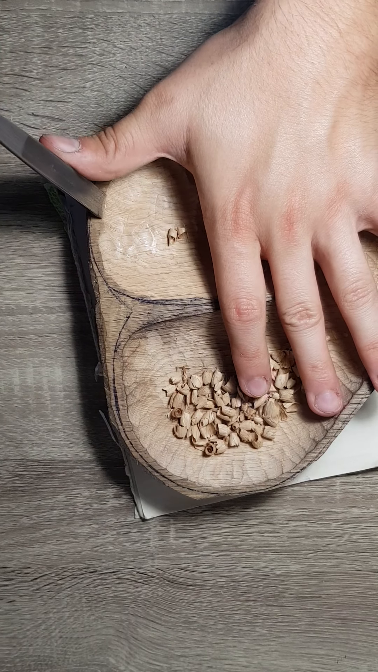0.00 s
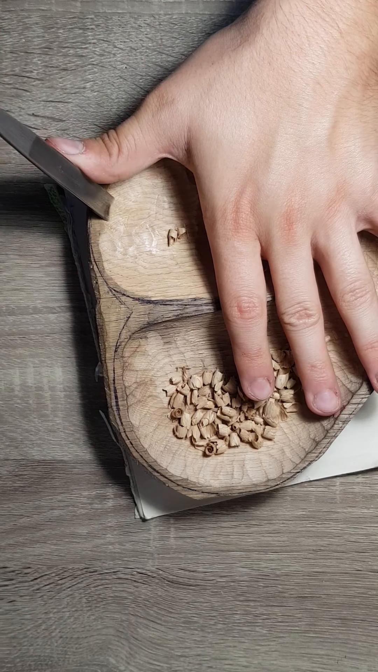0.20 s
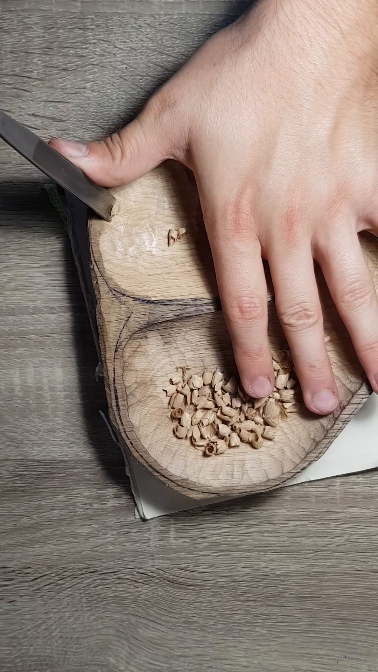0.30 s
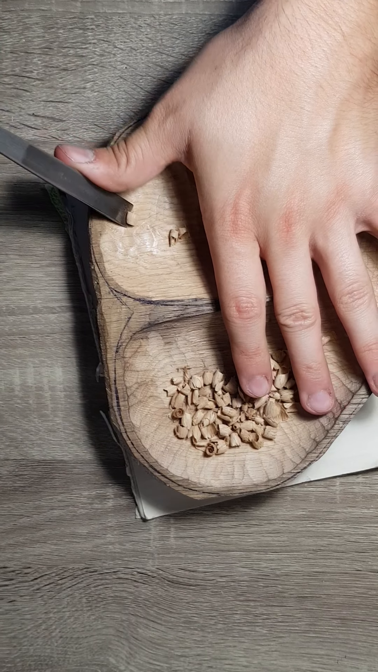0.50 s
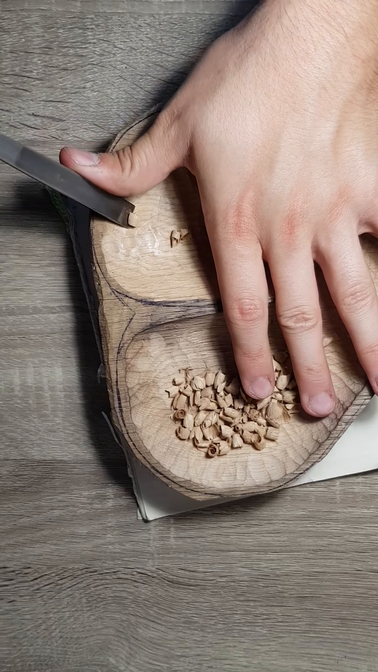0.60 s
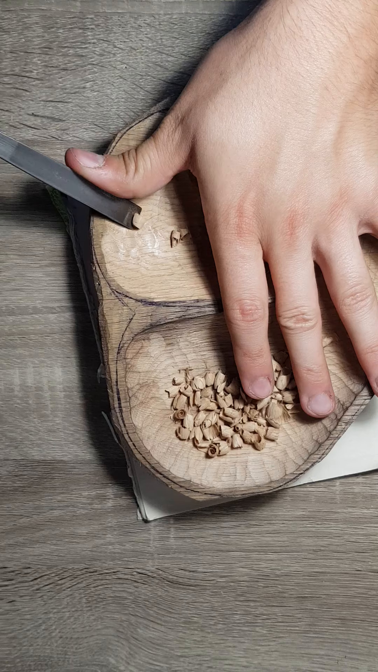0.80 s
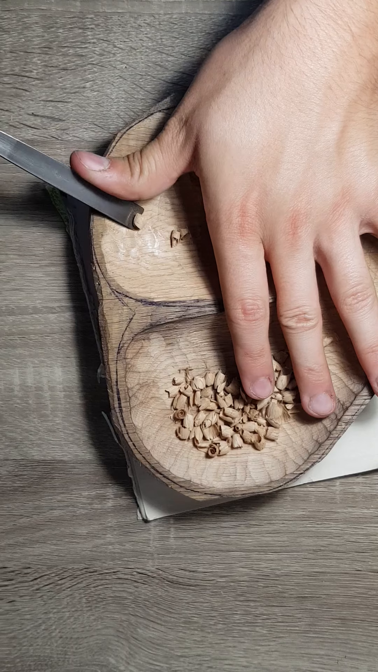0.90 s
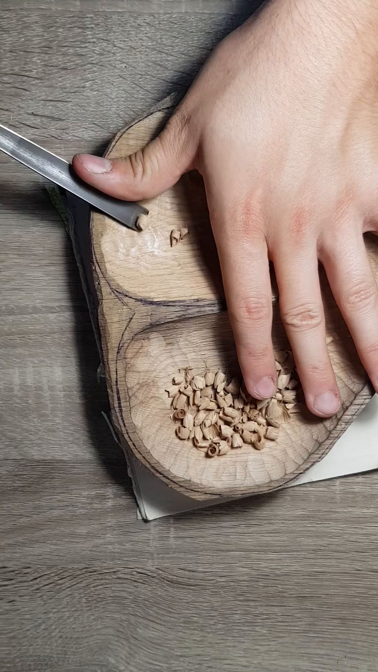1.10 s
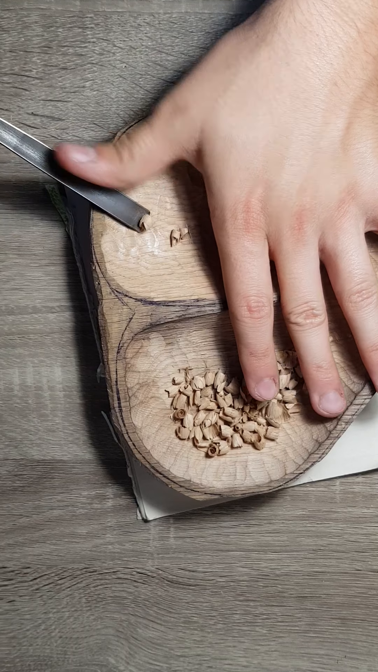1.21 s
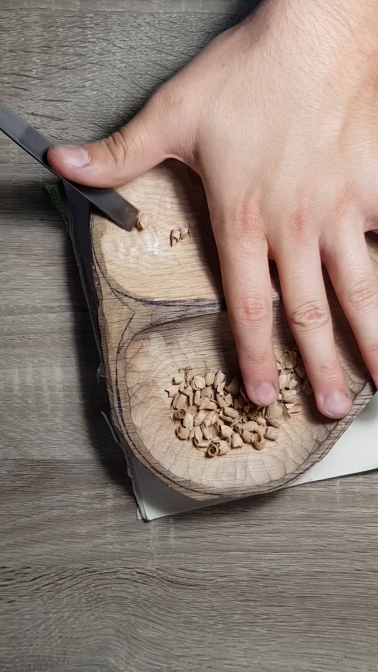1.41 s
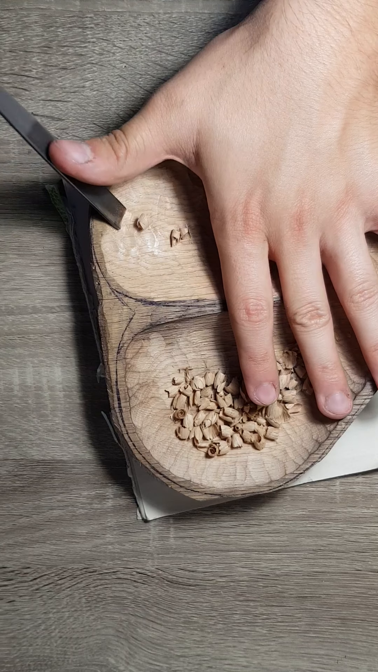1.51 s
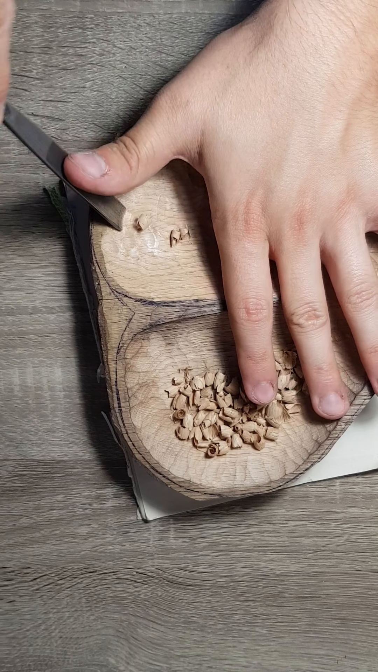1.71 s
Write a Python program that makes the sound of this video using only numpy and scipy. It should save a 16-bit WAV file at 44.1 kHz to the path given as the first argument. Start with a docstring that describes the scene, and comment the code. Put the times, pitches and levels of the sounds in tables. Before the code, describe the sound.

A hand-pushed gouge cuts a wooden bowl blank: a faint rub, a short crunchy knock, then a longer, stronger crunch with low bench thump; light taps and scuffs follow. Quiet bare room, close stereo microphone.

```python
"""A steel edge is first heard rubbing faintly on wood, then a hand-pushed gouge bites twice into a bowl blank.
As fibres give way, each jerk excites decaying modes of the bench (thump) and of the bowl (knock), while
filtered bursts of random grains and short rings make the crackle; narrow bands of grains make thin steel tones.
Light taps and soft scuffs follow as the tool is reset and rubs again.
A bare, quiet room adds reverberation and a faint rumble and hiss."""
import sys
import numpy as np
from scipy import signal
from scipy.fft import rfft, irfft
from scipy.io import wavfile

SR = 44100
rng = np.random.default_rng(int(sys.argv[2]) if len(sys.argv) > 2 else 0)


def wav_record(signal):
    """Record a signal, one row per channel, as 16-bit PCM in the file named by sys.argv[1]."""
    frames = np.transpose(np.atleast_2d(signal))
    bounded = np.clip(frames, -1, 1)
    # unit amplitude maps onto the largest positive 16-bit level
    quanta = np.round(bounded * 32767).astype(np.int16)
    wavfile.write(sys.argv[1], SR, quanta)


N = 79380  # length [samples]

# Table levels are relative; the gains below and the filters set the final balance.
# Fibres giving way: (time [s], bench thump [dB], bowl knock [dB], crack [dB], splinter fizz [dB],
# softness of the jerk [s])
FIBRE_BREAKS = [(0.1501, -39.5, -45.5, -52.5, -84, 0.00056), (.1890, -24, -20, -38.5, -75, 0.00048),
                (0.2107, -18.5, -22, -34, -62.5, 0.0004), (0.237, -32.5, -38.5, -45.5, -60, 0.0002),
                (0.2483, -13, -10.5, -31.5, -64, 0.00051), (0.2593, -14.5, -9, -41.5, -52, 0.00049),
                (0.267, -23, -20.5, -32.5, -52, 0.00025), (0.2855, -14, -8, -33, -50.5, 0.00069),
                (0.4404, -12.5, -4.5, -28.5, -48.5, 0.00024), (0.4608, -19.5, -8, -30, -50, 0.00054),
                (0.4694, -28, -26, -38, -58, 0.00089), (0.4786, -22, -18, -37.5, -58.5, 0.00048),
                (0.495, -11.5, -21.5, -43, -56, 0.00043), (0.5132, -14, -6, -32.5, -44.5, 0.00041),
                (0.5353, -14, -2, -36, -41, 0.0008), (0.5422, -25.5, -10, -24, -44.5, 0.00026),
                (0.5499, -24, -25, -28.5, -57.5, .00031), (0.5677, -15.5, -28, -26.5, -50, 0.00046),
                (.6760, -14.5, -12, -31, -56.5, 0.00046)]
# Light taps of the tool: (time [s], bench thump [dB], bowl knock [dB], tick [dB])
TOOL_TAPS = [(0.8314, -49.5, -45.5, -46), (0.896, -50, -62, -49.5), (.980, -47, -46.5, -70),
             (1.103, -55.5, -71, -89), (1.471, -57.5, -61, -77.5)]
# Soft scuffs as tool and hand shift: (time [s], low bump [dB], hollow knock [dB], rasp [dB])
SOFT_SCUFFS = [(1.062, -73, -69, -86), (1.238, -72, -62.5, -83), (1.347, -60.5, -72.5, -98),
               (1.468, -54.5, -67, -63)]
# Squeaks and faint rings of the steel: (time [s], length [s], frequency [Hz], level [dB])
STEEL_TONES = [(0.13, 0.052, 3470, -64.5), (0.231, 0.064, 3780, -56.5), (0.939, 0.16, 2316, -76.5),
               (1.132, .06, 2386, -82), (1.495, 0.075, 3495, -88.5)]
# Rubbing of the edge: (time [s], level [dB])
RUB_LEVEL = [(0, -100), (0.098, -87), (.145, -61), (0.179, -54.5), (0.198, -36.5), (.28, -72), (.31, -69.5),
             (.43, -79), (0.451, -36.5), (0.551, -33), (.60, -75.5), (0.701, -62), (.92, -62), (1.1, -81),
             (1.699, -104), (1.739, -70.5), (1.763, -62), (1.8, -60)]
# Rumble of the hand shifting the blank: (time [s], level [dB])
HANDLING_LEVEL = [(0, -100), (0.999, -78), (1.21, -76), (1.339, -64), (1.429, -62.5), (1.501, -60),
                  (1.571, -68.5), (1.64, -61), (1.721, -67.5), (1.761, -56.5), (1.8, -57.5)]
# Mode frequencies of the bowl: (frequency [Hz])
BOWL_PITCHES = [229, 243, 270, 350, 385, 398, 451, 593, 640, 715, 827, 930, 1012, 1060, 1171, 1321, 1432,
                1608]
# Modes of the bowl, in the same order: (level [dB], 60 dB decay time [s], left minus right [dB])
BOWL_MODES = [(-22, 0.66, 1.5), (7.5, .013, 0.5), (-13, 0.11, 3), (-1.5, 0.066, -2), (-9, 0.24, -5.5),
              (-33.5, .27, -1.5), (-31, 0.11, 2), (-9, 0.13, 1), (-11, .1, 0), (-9, 0.076, 3.5),
              (-14.5, 0.18, -11), (-4.5, 0.05, 10.5), (-10.5, 0.079, 1), (-22, 0.033, -3), (-12.5, .21, -1),
              (-16.5, 0.084, 3.5), (-14.5, .25, -1.5), (-6, 0.26, 3.5)]
# Mode frequencies of the bench: (frequency [Hz])
BENCH_PITCHES = [38, 69, 89, 110, 127, 133, 146, 197]
# Modes of the bench, in the same order: (level [dB], 60 dB decay time [s])
BENCH_MODES = [(-26.5, .6), (-14.5, 1), (-15, .42), (-16, 0.69), (-8, .58), (0, .42), (-12.5, 0.54),
               (-17.5, 0.58)]
# Spectrum of cracking and of the rubbing rasp: (frequency [Hz], density [dB per Hz])
CRACK_SPECTRUM = [(200, -29.5), (550, 6), (1000, 4), (1400, -3), (1750, 0), (2050, -6.5), (2400, -3.5),
                  (3100, -11.5), (3500, -7), (4400, -15), (4700, -18.5), (5200, -26.5), (5900, -19.5),
                  (8000, -34), (11000, -36.5), (16000, -39)]
# Spectrum of splinter fizz: (frequency [Hz], density [dB per Hz])
FIZZ_SPECTRUM = [(2000, -28), (5500, 9), (8300, -12), (10200, 1), (13000, -1.5), (16000, -8)]
# Spectrum of the groaning wood and the low bumps: (frequency [Hz], density [dB per Hz])
GROAN_SPECTRUM = [(25, -13), (70, -2), (130, 0), (200, -6.5), (380, -11), (520, -27), (1200, -42),
                  (4000, -86)]
# Spectrum of the hollow knock in a scuff: (frequency [Hz], density [dB per Hz])
HOLLOW_SPECTRUM = [(150, -22.5), (300, -16.5), (393, 10), (490, -6.5), (635, 4), (760, -18.5), (1100, -29),
                   (3000, -41)]
# Spectrum of the handling rumble: (frequency [Hz], density [dB per Hz])
RUMBLE_SPECTRUM = [(20, -12), (38, -2), (70, -11), (100, -7), (140, 2), (190, -13), (260, -21), (400, -32),
                   (1000, -59.5), (4000, -90.5)]
# Spectrum of the background rumble and hiss: (frequency [Hz], density [dB per Hz])
FLOOR_SPECTRUM = [(20, -7.5), (40, 4), (120, -3), (250, -12.5), (500, -24), (1000, -26), (2400, -28),
                  (8000, -37), (11000, -33.5), (16000, -32.5)]
# Direction of the cutting edge: (frequency [Hz], left minus right [dB])
EDGE_BALANCE = [(600, -2.5), (1250, 3), (2400, -6), (4400, 3), (6000, 5.5), (8000, 10.5)]
# Reverberation of the room: (frequency [Hz], 60 dB decay time [s], level [dB])
ROOM_DECAY = [(50, 0.55, -15), (135, 0.32, -10.5), (345, 0.48, -9.5), (800, 0.44, -7), (2370, 0.38, -6),
              (4830, 0.51, -12.5), (7730, 0.16, -8.5), (14000, .35, -12.5)]

# Gains of the sources [dB]
BENCH_DB, BOWL_DB, CRACK_DB, FIZZ_DB, RUB_DB, GROAN_DB, FLOOR_DB = -2.5, -5, -2.5, 2, -5, 8.5, -72
CRACK_PAN_DB, FIZZ_PAN_DB = -2.5, 10.5  # left minus right
PUSH_LAG_S, TAP_PUSH_S = .0028, 0.00027  # jerk after its crack, softness of a tap
EAR_LAG_S = 0.00032  # right channel after left, for the bowl
GRAINS_PER_S, GRAIN_SPREAD_DB = 6500, 5.0
CRACK_RISE_S, CRACK_FALL_S = 0.0025, .008
FIZZ_RISE_S, FIZZ_FALL_S = .0010, .0045
SCUFF_RISE_S, SCUFF_FALL_S = 0.0064, 0.021
SNAP_LOW_HZ, SNAP_HIGH_HZ, SNAP_T60_S, SNAP_SCATTER_S = 1438, 5480, 0.0098, .007
SNAP_DB, SNAP_DB_PER_OCTAVE = -3.5, -4
TONE_WIDTH_HZ = 400
ROOM_BUILD_S, ALIKE_BELOW_HZ = .008, 600
TOP_HZ = 15850
TIME = np.arange(N) / SR  # [s]
BINS_HZ = np.arange(N // 2 + 1) * SR / N


def undb(db):
    """Amplitude ratio is ten to the power of level over twenty."""
    return 10 ** (np.asarray(db) / 20)


def along(table, hz, axis=1):
    """Interpolation on a logarithmic frequency axis, for one column of a table."""
    rows = np.array(table, float)
    return np.interp(np.log(np.maximum(hz, 1)), np.log(rows[:, 0]), rows[:, axis])


def level_over_time(table):
    """Linear interpolation in decibels gives exponential changes of amplitude."""
    return undb(np.interp(TIME, *np.array(table).T))


def ring(x, response):
    """A linear system's output is its input convolved with its impulse response."""
    return signal.fftconvolve(np.atleast_2d(x), np.atleast_2d(response), axes=-1)[:, :N]


def colour(x, table, size=4096):
    """Minimum-phase filtering: a folded cepstrum gives a causal response, here of unit power."""
    magnitude = undb(along(table, np.arange(size // 2 + 1) * SR / size))
    cepstrum = irfft(np.log(magnitude))
    cepstrum[1:size // 2] *= 2
    cepstrum[size // 2 + 1:] = 0
    response = irfft(np.exp(rfft(cepstrum)))
    return ring(x, response / np.linalg.norm(response))


def pan(db):
    """Interchannel level difference, as left and right gains of unit mean power."""
    gains = undb(np.array([[db], [-db]]) / 2)
    return gains / np.sqrt(np.mean(gains ** 2))


def diffuse():
    """A diffuse field: stereo noise, coherent in the bass and uncorrelated in the treble."""
    mid, side = rng.standard_normal((2, N))
    alike = .985 * np.exp(-(BINS_HZ / ALIKE_BELOW_HZ) ** 2)
    common = rfft(mid) * np.sqrt((1 + alike) / 2)
    opposed = rfft(side) * np.sqrt((1 - alike) / 2)
    return irfft(common + opposed * np.array([[1], [-1]]), N)


def grains():
    """Micro-fracture as dense random impulses of uneven size, at unit power."""
    struck = rng.random((2, N)) < GRAINS_PER_S / SR
    impulses = struck * np.sign(rng.standard_normal((2, N)))
    spread = np.clip(rng.standard_normal((2, N)), -2, 2)
    impulses = impulses * undb(GRAIN_SPREAD_DB * spread)
    return impulses / impulses.std()


def bursts(rows, rise, fall):
    """Independent bursts add in power: grains flare at each (time, level) and decay exponentially."""
    power = 0
    for start, db in rows:
        age = np.maximum(TIME - start, 0)
        attack = np.minimum(age / rise, 1)
        decay = np.exp(-np.clip((age - rise) / fall, 0, 20))
        power = power + (undb(db) * attack * decay) ** 2
    return np.sqrt(power) * grains()


def jerks(rows):
    """Impulsive force: a Gaussian push per (time, level, softness), its area set by the level."""
    force = 0
    for start, db, soft in rows:
        offset = (TIME - start - PUSH_LAG_S) / soft
        pulse = np.exp(-np.minimum(offset ** 2 / 2, 30))
        force = force - undb(db) * pulse / (np.sqrt(2 * np.pi) * soft * SR)
    return force


def mode(hz, t60):
    """A damped oscillator, differentiated so that it gives the air no net push."""
    pole = 2j * np.pi * hz - np.log(1000) / t60
    vibration = np.exp(pole * TIME).imag
    return np.diff(vibration, prepend=0) * SR / (2 * np.pi * hz)


def bowl(rows):
    """Modal superposition: jerks and taps excite the hollow blank, heard slightly later on the right."""
    response = 0
    for hz, (db, t60, side) in zip(BOWL_PITCHES, BOWL_MODES):
        response = response + undb(db) * pan(side) * mode(hz, t60)
    left, right = ring(jerks(rows), response)
    early = np.interp(TIME + EAR_LAG_S / 2, TIME, left)
    late = np.interp(TIME - EAR_LAG_S / 2, TIME, right)
    return undb(BOWL_DB) * np.array([early, late])


def bench(rows):
    """Modal superposition: each jerk or tap excites the low modes of the bench top."""
    response = 0
    for hz, (db, t60) in zip(BENCH_PITCHES, BENCH_MODES):
        response = response + undb(db) * mode(hz, t60)
    return undb(BENCH_DB) * ring(jerks(rows), response)


def cracks(rows):
    """Impulsive noise: each break or tap releases a filtered burst of grains."""
    crackle = colour(bursts(rows, CRACK_RISE_S, CRACK_FALL_S), CRACK_SPECTRUM)
    return crackle * undb(CRACK_DB) * pan(CRACK_PAN_DB)


def snaps(rows, count=4):
    """Transient resonance: each break or tap adds short rings at random pitches."""
    out = np.zeros((2, N))
    for (start, db), draws in zip(rows, rng.random((len(rows), count, 3))):
        for pitch, late, side in draws:
            hz = SNAP_LOW_HZ * (SNAP_HIGH_HZ / SNAP_LOW_HZ) ** pitch
            age = TIME - start - late * SNAP_SCATTER_S
            on = (age > 0) & (age < SNAP_T60_S)
            age = age[on]
            gain = undb(db + SNAP_DB + SNAP_DB_PER_OCTAVE * np.log2(hz / SNAP_LOW_HZ))
            attack = 1 - np.exp(-age * hz / 2)
            decay = np.exp(-np.log(1000) * age / SNAP_T60_S)
            snap = np.sin(2 * np.pi * hz * age) * decay * attack
            out[:, on] += gain * pan(12 * (side - .5)) * snap
    return out


def fizz(rows):
    """Fine splintering: brief treble bursts of grains, stronger on the left."""
    splinters = colour(bursts(rows, FIZZ_RISE_S, FIZZ_FALL_S), FIZZ_SPECTRUM)
    return splinters * undb(FIZZ_DB) * pan(FIZZ_PAN_DB)


def rubbing():
    """Sliding friction: the edge drags over the grain with a fine rasp above a low groan."""
    gain = level_over_time(RUB_LEVEL)
    rasp = colour(gain * grains(), CRACK_SPECTRUM)
    groan = colour(gain * diffuse(), GROAN_SPECTRUM)
    return undb(RUB_DB) * rasp + undb(GROAN_DB) * groan


def steel_tones():
    """Narrow-band filtering: a resonance selects one band of the grains for each squeak or faint ring."""
    out = 0
    for start, length, pitch, db in STEEL_TONES:
        resonance = 1 / (1 + (2 * (BINS_HZ - pitch) / TONE_WIDTH_HZ) ** 2)
        tone = irfft(rfft(grains()) * resonance, N)
        swell = np.sin(np.pi * np.clip((TIME - start) / length, 0, 1))
        out = out + undb(db) * tone / tone.std() * swell
    return out


def lean(x):
    """Frequency-dependent directivity: each pitch of the edge radiates more to one side."""
    side = along(EDGE_BALANCE, np.arange(N + 1) * SR / (2 * N))
    gains = undb(np.array([side, -side]) / 2)
    return irfft(rfft(x, 2 * N) * gains)[:, :N]  # zero padding limits wrap-around


def scuffs():
    """Slow granular contact: a low bump, a hollow knock and a little rasp."""
    rows = np.array(SOFT_SCUFFS)
    low, knock, rasp = (bursts(rows[:, [0, k]], SCUFF_RISE_S, SCUFF_FALL_S) for k in range(1, 4))
    bump = colour(low[0], GROAN_SPECTRUM)  # bump and knock are central
    hollow = colour(knock[0], HOLLOW_SPECTRUM)
    return bump + hollow + colour(rasp, CRACK_SPECTRUM)


def handling():
    """Low-frequency contact noise: the hand leans on the blank, which rumbles against the bench."""
    return colour(level_over_time(HANDLING_LEVEL) * diffuse(), RUMBLE_SPECTRUM)


def room(x, count=18):
    """Reverberation: convolution with noise that decays exponentially at a rate set for each band."""
    centres = np.geomspace(40, 15000, count)
    noise, tail = rfft(diffuse()), 0
    for centre, pick in zip(centres, np.eye(count)):
        share = np.interp(BINS_HZ, centres, pick)  # overlapping band about the centre
        decay = undb(-60 * TIME / along(ROOM_DECAY, centre))
        build = 1 - np.exp(-TIME / ROOM_BUILD_S)
        band = irfft(noise * share, N) * decay * build
        even = np.sqrt(np.mean(share ** 2) * 2 / np.sum(band ** 2))
        tail = tail + band * even * undb(along(ROOM_DECAY, centre, axis=2))
    return ring(x, tail)


def background():
    """Stationary noise: a faint, steady rumble and hiss."""
    return undb(FLOOR_DB) * colour(diffuse(), FLOOR_SPECTRUM)


def scene():
    """Superposition: direct sounds, their reverberation and the background add linearly."""
    breaks = [(*row[:4], row[5]) for row in FIBRE_BREAKS]
    taps = [(*row, TAP_PUSH_S) for row in TOOL_TAPS]
    contacts = np.array(breaks + taps)  # time, thump, knock, crack or tick, softness
    crack_rows = contacts[:, [0, 3]]
    body = bench(contacts[:, [0, 1, 4]]) + bowl(contacts[:, [0, 2, 4]])
    edge = lean(cracks(crack_rows) + snaps(crack_rows) + rubbing() + steel_tones())
    splinters = fizz(np.array(FIBRE_BREAKS)[:, [0, 4]])
    near = body + edge + splinters + scuffs() + handling()
    return near + room(near) + background()


def record(dry):
    """Peak clipping at full scale, then band limitation by a steep elliptic low-pass filter."""
    lowpass = signal.ellip(10, .2, 80, TOP_HZ, fs=SR, output="sos")
    return signal.sosfilt(lowpass, np.clip(dry, -1, 1))


dry = scene()
out = record(dry)
wav_record(out)
```